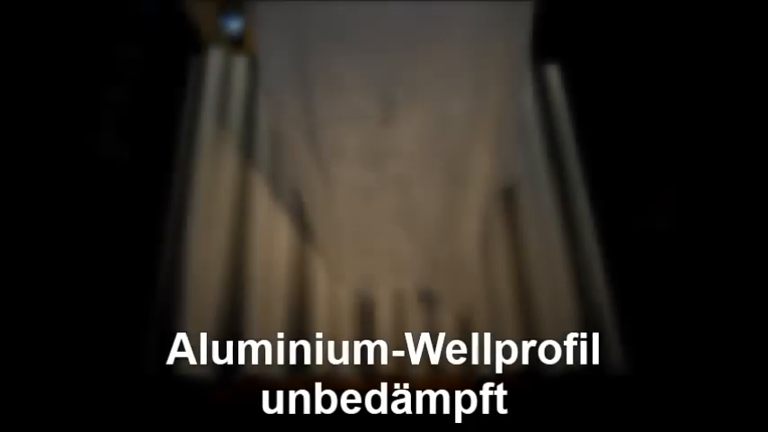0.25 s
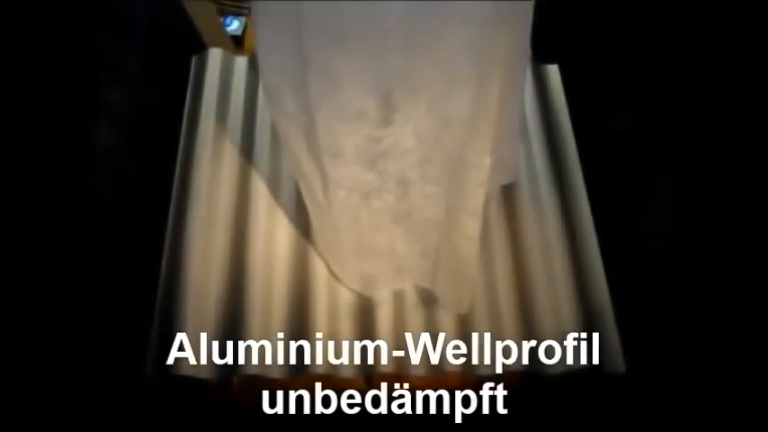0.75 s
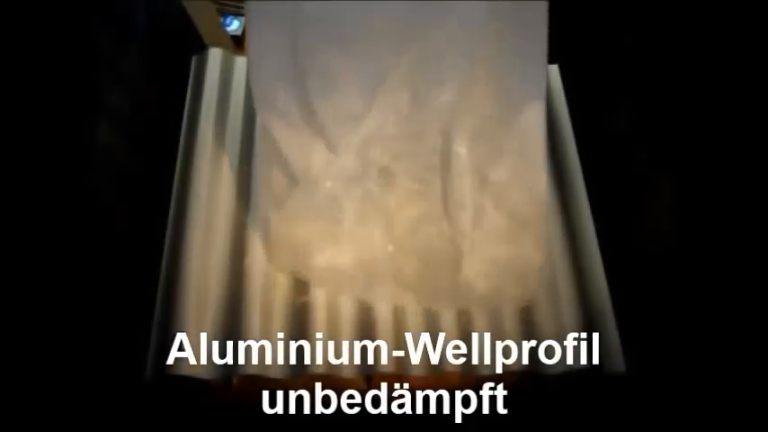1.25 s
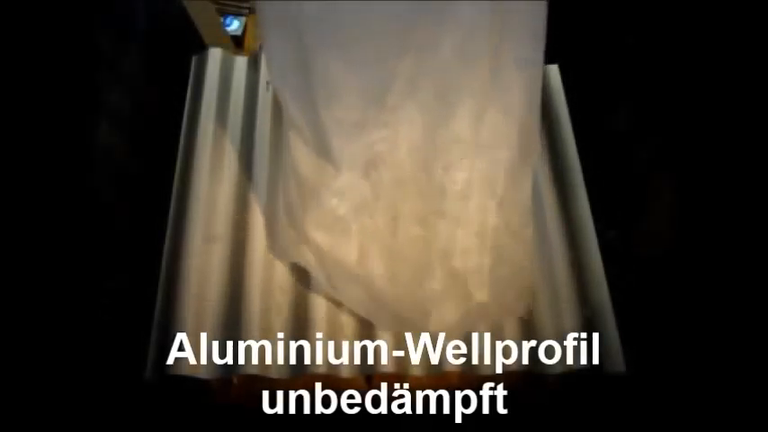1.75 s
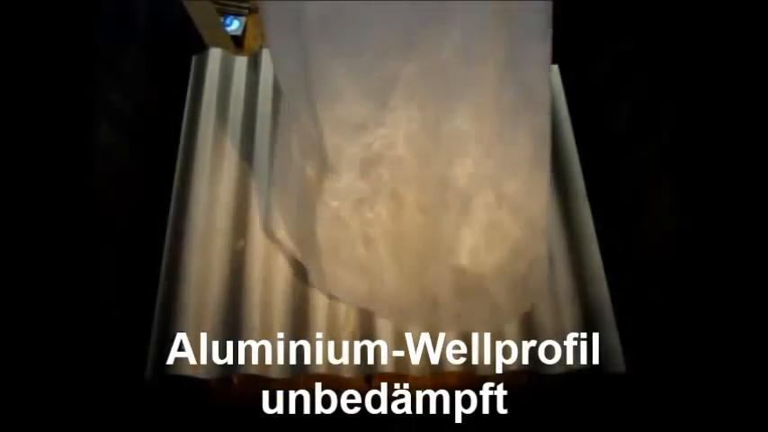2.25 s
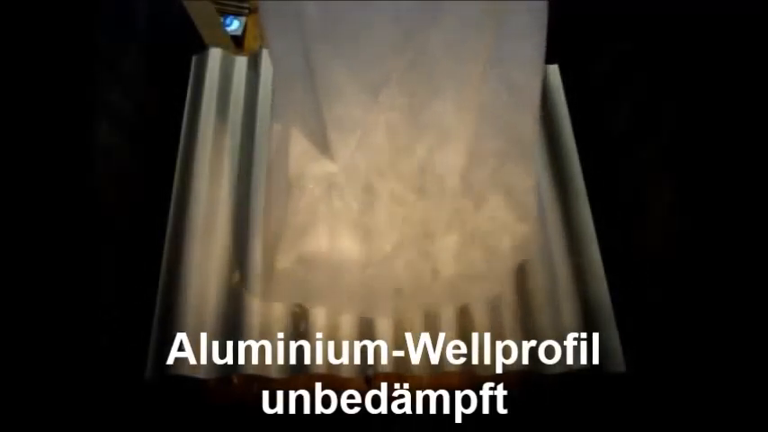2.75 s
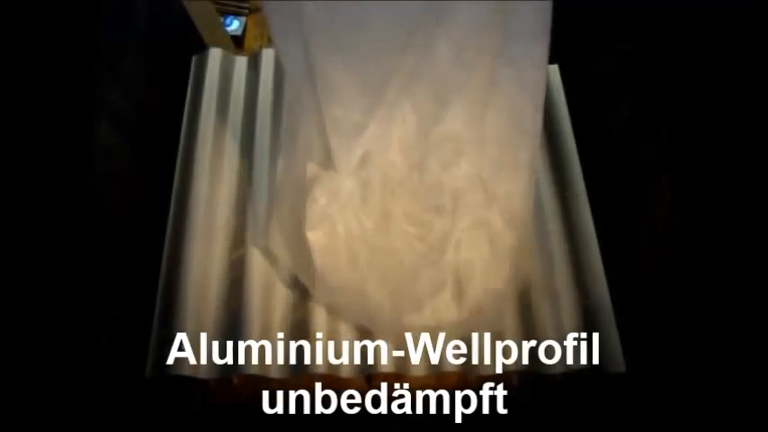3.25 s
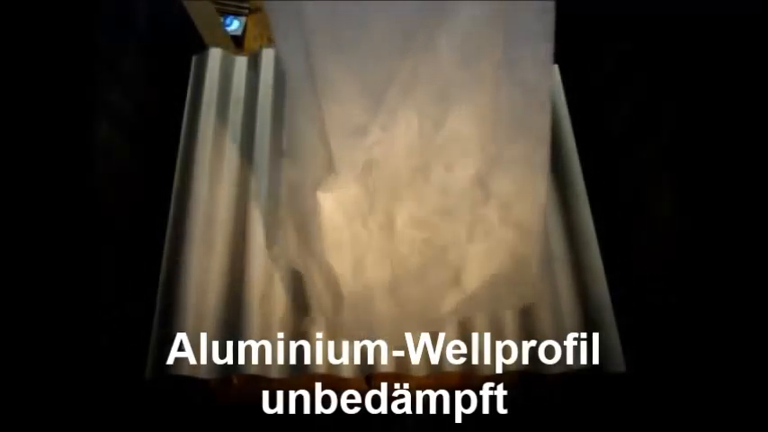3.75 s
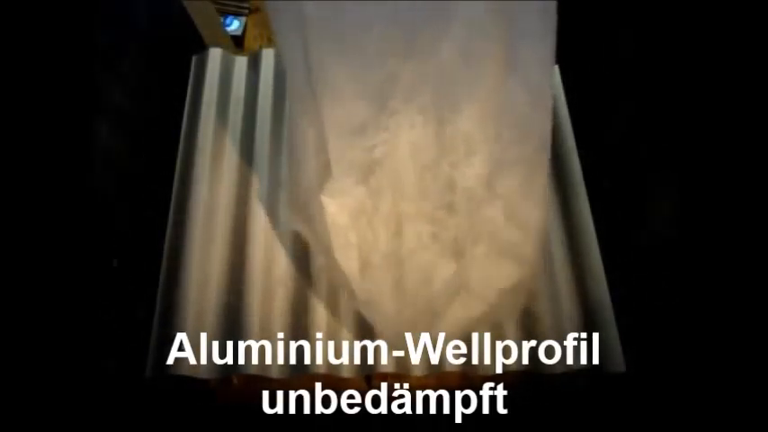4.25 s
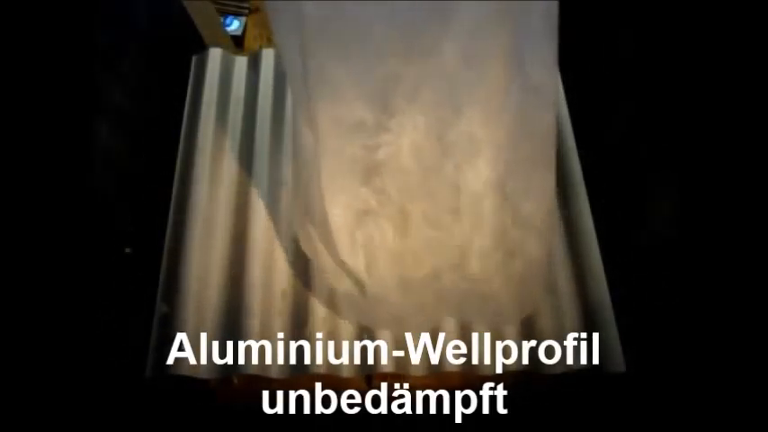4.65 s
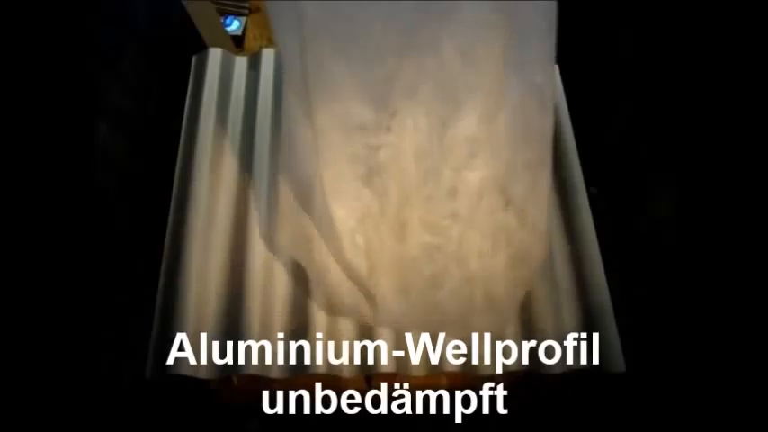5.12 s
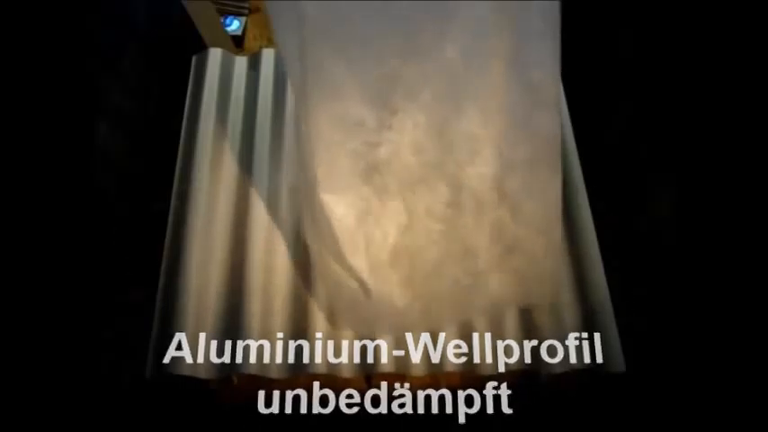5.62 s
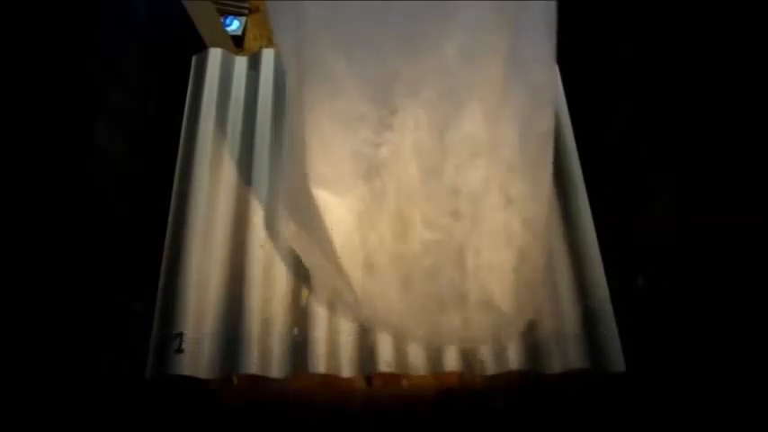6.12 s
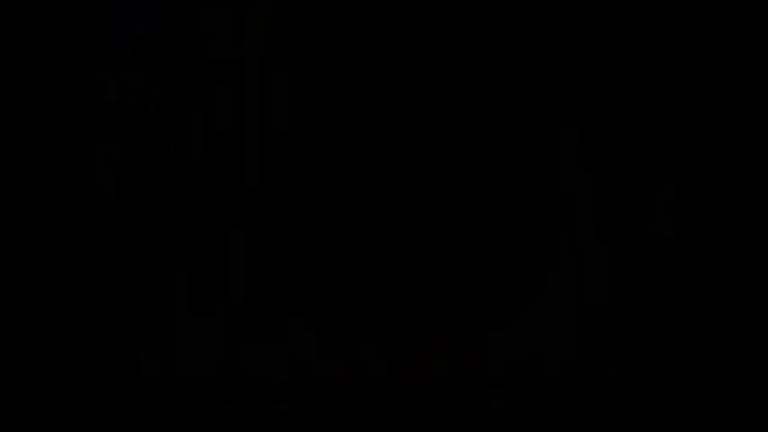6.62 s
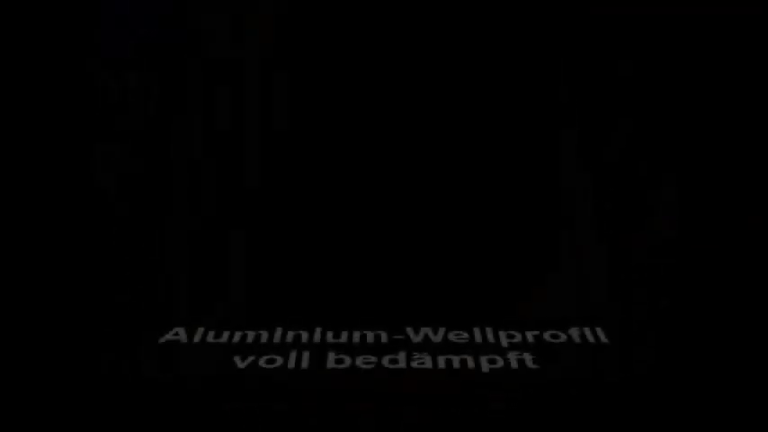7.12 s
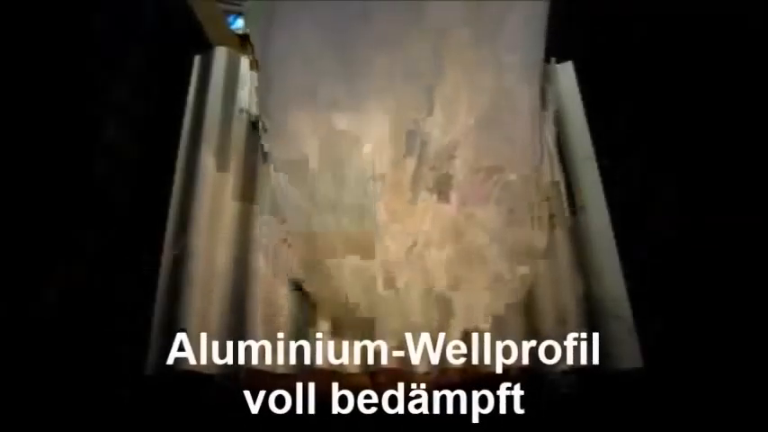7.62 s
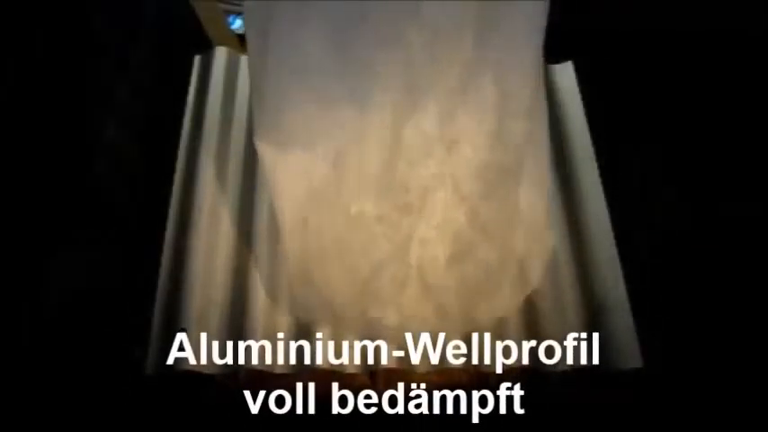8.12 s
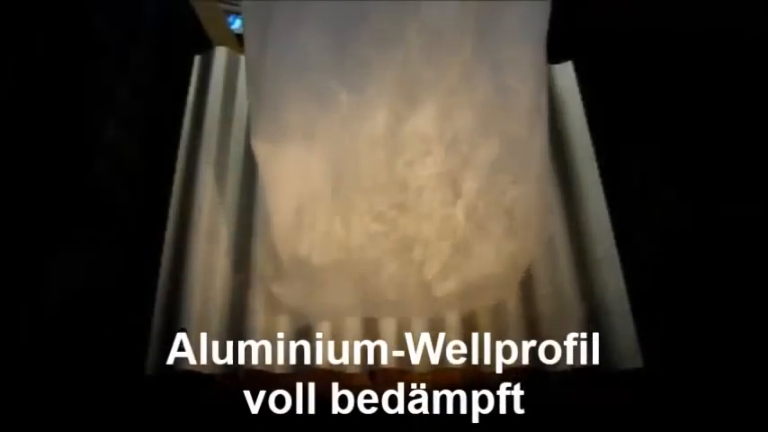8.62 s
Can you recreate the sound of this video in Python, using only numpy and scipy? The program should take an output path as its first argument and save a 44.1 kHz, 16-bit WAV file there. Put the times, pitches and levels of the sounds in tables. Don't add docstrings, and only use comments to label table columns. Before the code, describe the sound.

Buzzing mains hum, a brief brassy rattle, a harsh bright roar of spray on sheet metal, short silence, then a softer, damped drumming.

```python
import sys
import numpy as np
from scipy import signal
from scipy.fft import rfft, irfft, next_fast_len
from scipy.io import wavfile
from scipy.ndimage import uniform_filter1d, map_coordinates

SR = 44100
rng = np.random.default_rng(int(sys.argv[2]) if len(sys.argv) > 2 else 0)


def how_loud(loudness_db):
    steps = np.asarray(loudness_db, float) / 20
    return 10 ** steps


def transcribe(signal):
    frames = np.atleast_2d(signal).T
    limited = np.clip(frames, -1, 1)
    pcm = np.round(limited * 32767).astype(np.int16)
    wavfile.write(sys.argv[1], SR, pcm)


N = 391166

# (frequency [Hz], level [dB per Hz])
HISS_COLOUR = [(40, -3), (120, -1), (300, -6), (700, -14.5), (1300, -18.5), (8000, -21), (12500, -18.5),
               (16000, -19)]
# (frequency [Hz], level [dB])
SPIKE_COLOUR = [(300, -32.5), (2000, 1.5), (4500, 3.5), (10000, -6.5), (14500, 2), (16000, -7.5)]
# (time [s], peak level [dB], thud relative to it [dB], rattle 60 dB decay time [s])
VALVE_CONTACTS = [
    (0.812, -38, 7.5, 0.035),
    (0.817, -34.5, 0, 0.029),
    (0.827, -34, -5, 0.053),
    (0.8414, -40, -5, 0.04),
]
# (frequency [Hz], width [Hz], level [dB])
VALVE_BODY = [(2010, 80, -11.5), (2930, 26, 7), (3100, 60, -8), (3440, 80, -4), (4190, 60, 2),
              (5400, 70, 4.5), (6900, 150, -8), (7300, 120, -5), (8070, 40, -16), (9380, 100, -16),
              (10800, 120, -23), (12900, 120, -16)]
# (frequency [Hz], width [Hz], level [dB])
PIPE_MODES = [(350, 75, 4), (905, 170, -6), (1240, 76, -2)]
# (water heard from [s], water heard until [s], drumming level [dB], splash relative to drumming [dB])
SHOWERS = [
    (1.078, 6.76, -17, -8),
    (7.0934, 9.0, -27, -8),
]
# (time [s], depth [dB], half length [s])
STREAM_BREAKS = [(1.094, 6.5, .013), (1.181, 7, 0.015), (1.313, 4, .012), (1.842, 3.5, .015),
                 (3.372, 5, .01), (3.61, 1.5, .018), (3.877, 2, .01), (4.743, 5.5, 0.015), (5.029, 2, .012),
                 (5.245, 7, .008), (5.535, 3.5, .008), (5.937, 3, .012), (7.351, 5.5, .012), (7.65, 3, .01),
                 (7.714, 0, .014), (7.992, 0, .03), (8.256, 4.5, .008), (8.397, 2.5, .014),
                 (8.698, 9.5, 0.011)]
# (frequency [Hz], level [dB per Hz])
SPLASH_COLOUR = [(5000, -30), (8000, -17.5), (10500, -7.5), (12000, -3), (13300, -2), (14500, 1),
                 (16000, -1)]
# (frequency [Hz], level [dB per Hz])
BARE_BROAD = [(40, -46), (70, -20), (320, -19), (590, -16), (740, -8), (880, -9), (2500, -7), (2850, -8.5),
              (3120, -1), (4400, -2), (5400, -1), (5700, -2.5), (7600, -8.5), (8700, -7.5), (12500, -18),
              (16000, -30)]
# (frequency [Hz], level [dB per Hz])
DAMPED_BROAD = [(40, -50), (70, -23.5), (200, -6.5), (400, -14.5), (472, -5.5), (600, -21), (730, -4.5),
                (1080, -3.5), (1590, -4), (2860, -6), (4800, -6), (5330, -3.5), (5480, -6.5), (7900, -9),
                (12500, -20), (16000, -46)]
# (frequency [Hz], width [Hz], level [dB])
BARE_MODES = [(264, 34, -10), (969, 43, -7), (1220, 28, -8), (1350, 18, -8), (1550, 38, -7),
              (1925, 55, -5), (2330, 61, -7), (2600, 48, -7), (3605, 55, -5.5), (4195, 58, -1),
              (4510, 32, -4), (4862, 55, -2.5), (5248, 55, -4.5), (6034, 45, -3), (6380, 35, -1),
              (6720, 34, -2), (7030, 180, -7.5), (7540, 190, -6.5), (7850, 33, -5), (8200, 36, -4)]
# (frequency [Hz], width [Hz], level [dB])
BARE_FURTHER = [(385, 22, -13), (428, 22, -14), (1140, 22, -10), (2200, 22, -8), (3100, 30, -8),
                (3820, 22, -6), (3907, 22, -5)]
# (frequency [Hz], width [Hz], level [dB])
BARE_TREBLE = [(10130, 60, -14), (11120, 60, -14), (11700, 55, -13)]
# (frequency [Hz], width [Hz], level [dB])
DAMPED_STRONG = [(280, 110, -5), (1090, 110, 0), (1930, 74, -2), (2360, 40, -3), (2650, 170, -3),
                 (3110, 74, -2), (3370, 51, -2), (3790, 71, -2), (4490, 110, -3), (5050, 430, -2),
                 (6540, 80, -5), (7630, 240, -7)]

MAINS_HZ = 50.05
TOP_HZ = 15790
IR = 2 ** 15
OPENS_S, WEAK_START_DB, BUILD_S = 0.98, 5.5, 0.17
SPLASH_GAP = 1.4
RETURN_SHARE = .5
WANDER_DB = .9


def unit(x):
    return x / np.sqrt(np.mean(x ** 2) + 1e-20)


def along(points, hz):
    f, level = np.transpose(points)
    return np.interp(np.log(hz + 1), np.log(f + 1), level)


def wobble(rate):
    return map_coordinates(rng.standard_normal(4000), [np.arange(N) * rate / SR], mode="wrap")


def filtered(x, response):
    m = next_fast_len(N + 8192)
    return irfft(rfft(x, m) * response(np.fft.rfftfreq(m, 1 / SR)), m)[:N]


def causal(gain):
    c = irfft(np.log(gain + 1e-6))
    c = np.r_[c[0], 2 * c[1:IR // 2], np.zeros(IR // 2)]
    return irfft(np.exp(rfft(c)))[:IR // 2]


def peak(hz, centre, width):
    return 1 / (1 + (2 * (hz - centre) / width) ** 2)


def mode_power(hz, modes, level_db=0, width_share=1):
    return sum(how_loud(db + level_db) ** 2 * peak(hz, centre, width_share * width) for centre, width, db in modes)


def resonator(modes, floor_db):
    hz = np.fft.rfftfreq(IR, 1 / SR)
    power = mode_power(hz, modes) + how_loud(floor_db) ** 2 * peak(hz, 2500, 4000)
    body = causal(np.sqrt(power))
    return body / np.linalg.norm(body)


def tiles(x, gain):
    hz, _, z = signal.stft(x, SR, nperseg=1024)
    draw = rng.random((len(hz) // 8 + 1, z.shape[1] // 2 + 1))
    draw = draw.repeat(8, axis=0).repeat(2, axis=1)[:len(hz), :z.shape[1]]
    loud = np.abs(z).mean(axis=0) > how_loud(-75)
    return signal.istft(z * gain(hz[:, None], draw, loud), SR, nperseg=1024)[1][:N]


def running():
    t = np.arange(N) / SR
    return (t < SHOWERS[0][1]) | (t > SHOWERS[1][0])


def electronics():
    t = np.arange(N) / SR
    hiss = how_loud(-64.5) * unit(filtered(rng.standard_normal(N), lambda hz: how_loud(along(HISS_COLOUR, hz))))
    whine = how_loud(-68.5) * np.sin(2 * np.pi * 14040 * t) * np.clip((.275 - t) / .01, 0, 1)
    return hiss + whine - .0013


def mains():
    t, hz = np.arange(N) / SR, np.fft.rfftfreq(IR, 1 / SR)
    halves = 2 * MAINS_HZ * (t - .3066)
    sine = how_loud(-55) * np.cos(np.pi * halves - .4)
    sign = 1 - 2 * (np.floor(halves) % 2)
    cut_in = how_loud(-47.5) * (sign + .03) * np.exp(-((halves % 1) / 0.3) ** 5)
    cable = causal(np.sqrt(peak(hz, 0, 5000) + how_loud(7.5) ** 2 * peak(hz, 12870, 300)))
    early = np.floor(halves + .155)
    early_sign = 1 - 2 * (early % 2)
    switch = np.diff(early, prepend=early[0]) * early_sign * how_loud(.3 * rng.standard_normal(N))
    spikes = how_loud(-37.0) * signal.fftconvolve(switch, causal(how_loud(along(SPIKE_COLOUR, hz))))[:N]
    return signal.fftconvolve(cut_in, cable)[:N] + sine + spikes


def valve():
    t = np.arange(SR // 4) / SR
    rise = 1 - np.exp(-t / .001)
    rattles, thuds, echoes = np.zeros((3, N))
    for s, db, thud_db, t60 in VALVE_CONTACTS:
        here = slice(round(s * SR), round(s * SR) + len(t))
        burst = how_loud(db - 5.5 - 60 * t / np.clip(t60, .01, .1)) * rise
        echo = how_loud(db - 21.5 - 60 * t / 0.59) * rise
        rattles[here] += burst * rng.standard_normal(len(t))
        thuds[here] += how_loud(thud_db) * burst * rng.standard_normal(len(t))
        echoes[here] += echo * rng.standard_normal(len(t))
    echoes = filtered(echoes, lambda hz: 1 / (1 + (hz / 4600) ** 6))
    body_ring = signal.fftconvolve(rattles + echoes, resonator(VALVE_BODY, floor_db=-18))
    pipe_thud = signal.fftconvolve(thuds + 0.33 * echoes, resonator(PIPE_MODES, floor_db=-25))
    return (body_ring + pipe_thud)[:N]


def drops(share, spread_db):
    chance, size = rng.random(N), rng.standard_normal(N)
    return (chance < share) * how_loud(spread_db * size) * rng.standard_normal(N)


def stream():
    t = np.arange(N) / SR
    level_db = -WEAK_START_DB * np.exp(-np.abs(t - OPENS_S) / BUILD_S)
    for s, depth_db, half in STREAM_BREAKS:
        length = half * np.where(t > s, RETURN_SHARE, 1)
        level_db = level_db - depth_db * np.exp(-((t - s) / length) ** 2)
    return level_db


def wander(x):
    z = signal.stft(x, nperseg=1024)[2]
    field = uniform_filter1d(rng.standard_normal(z.shape), size=7, axis=0)
    field = uniform_filter1d(field, size=18, axis=1)
    return signal.istft(z * how_loud(WANDER_DB * unit(field)), nperseg=1024)[1][:N]


def sheet(broad, modes, broad_db, minor_db, minor_width, count):
    hz = np.fft.rfftfreq(IR, 1 / SR)
    crowd = rng.random((count, 2))
    lesser = sum(how_loud(minor_db + 5 * b) ** 2 * peak(hz, 900 + 12000 * a, minor_width) for a, b in crowd)
    power = how_loud(along(broad, hz) + broad_db) ** 2 * (1 + lesser)
    return causal(np.sqrt(power + mode_power(hz, modes, level_db=-1, width_share=.85)))


def shower(run, response, spread_db, lull_db, flutter_db):
    start, end, drum_db, splash_db = run
    t = np.arange(N) / SR
    gust = .3 * wobble(25) + .8 * wobble(85) + .85 * wobble(170)
    lull = -lull_db * np.log1p(np.exp(np.minimum(1.33 * gust, 3.5)))
    blows = drops(.5, spread_db) * how_loud(lull + stream())
    drum = unit(wander(signal.fftconvolve(blows, response)[:N]))
    flutter = flutter_db * (wobble(90) + .8 * wobble(170))
    spray = drops(.6, spread_db) * how_loud(lull + SPLASH_GAP * stream() + flutter)
    splash = how_loud(splash_db) * unit(filtered(spray, lambda hz: how_loud(along(SPLASH_COLOUR, hz))))
    return how_loud(drum_db) * (drum + splash) * (t > start) * (t < end)


def scene():
    bare_modes = BARE_MODES + BARE_FURTHER + BARE_TREBLE
    bare = sheet(BARE_BROAD, bare_modes, broad_db=-11.5, minor_db=2.0, minor_width=13, count=250)
    damped = sheet(DAMPED_BROAD, DAMPED_STRONG, broad_db=-3.5, minor_db=1.5, minor_width=19, count=140)
    first = shower(SHOWERS[0], bare, spread_db=1.1, lull_db=1.8, flutter_db=.75)
    second = shower(SHOWERS[1], damped, spread_db=2.5, lull_db=2.1, flutter_db=.6)
    background = running() * (mains() + electronics())
    mono = first + second + valve() + background
    return np.array([mono, mono])


def band_limit(x):
    return signal.sosfilt(signal.butter(12, 16870, fs=SR, output="sos"), x)


def record(dry):
    mono = dry[0] / (1 + np.abs(dry[0] / .47) ** 4) ** (1 / 4)

    def treble_gain(hz, draw, loud):
        weak_share = .02 * (hz > 8500) + .07 * (hz > 12500) + .25 * peak(hz, 13400, 396)
        return np.where(loud & (draw < weak_share), how_loud(-9), 1) * (hz < TOP_HZ)

    def side_gain(hz, draw, loud):
        rare = .012 * (hz < 1000) + 0.0054 * (hz > 4000) + 0.044 * (hz > 8500) + .04 * (hz > 13500)
        parted_share = np.where(loud, rare, 0.58 * peak(hz, 10000, 6000) ** 2)
        return how_loud(-16.0) * (draw < parted_share)

    mono = tiles(mono, treble_gain)
    side = tiles(mono, side_gain)
    return band_limit(np.array([mono + side, mono - side]))


dry = scene()
out = record(dry)
transcribe(out)
```